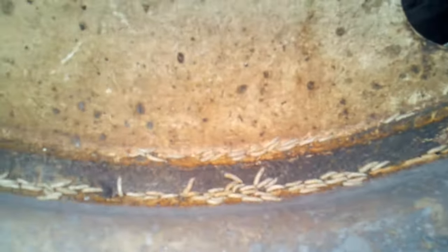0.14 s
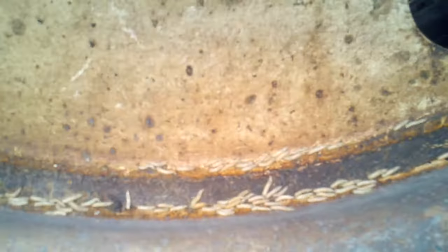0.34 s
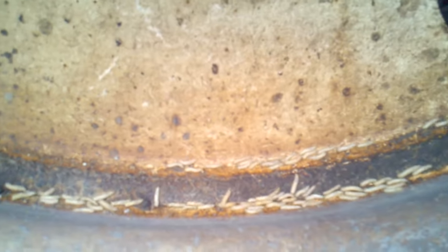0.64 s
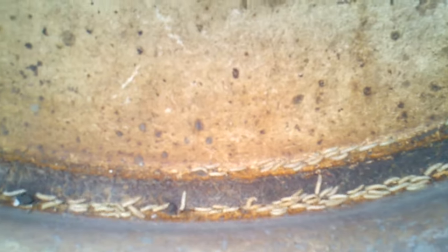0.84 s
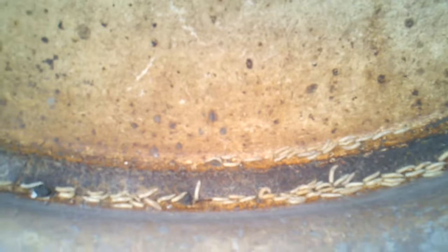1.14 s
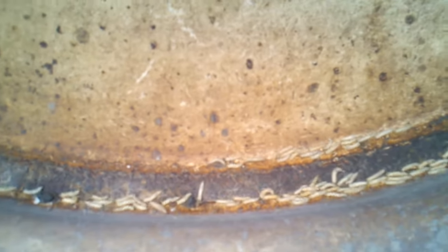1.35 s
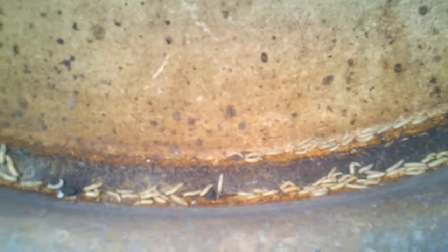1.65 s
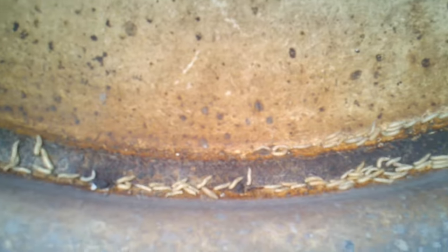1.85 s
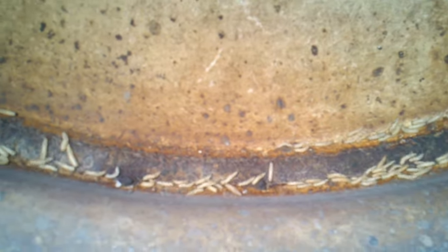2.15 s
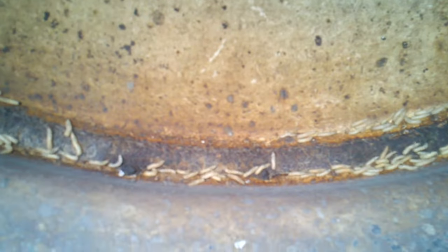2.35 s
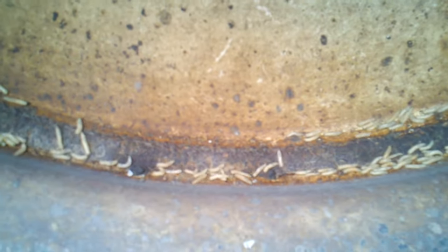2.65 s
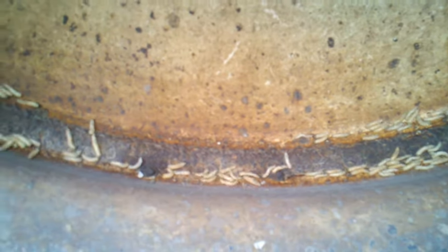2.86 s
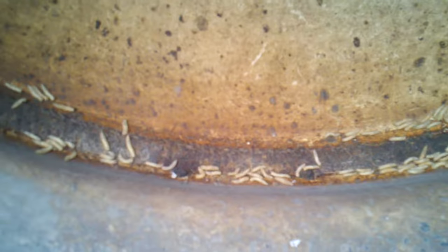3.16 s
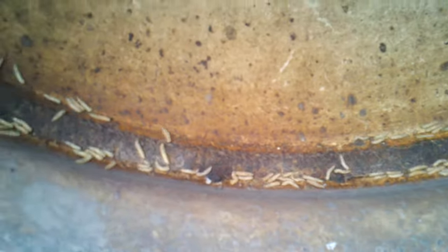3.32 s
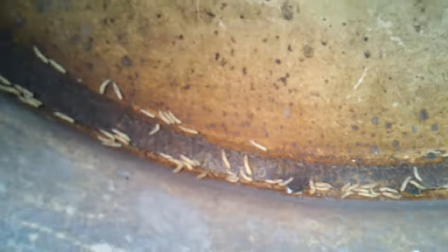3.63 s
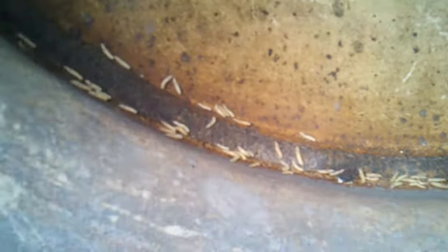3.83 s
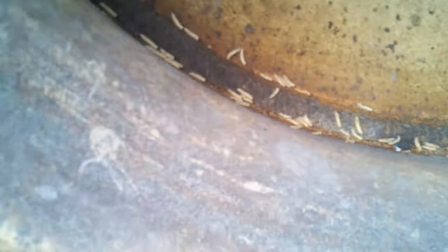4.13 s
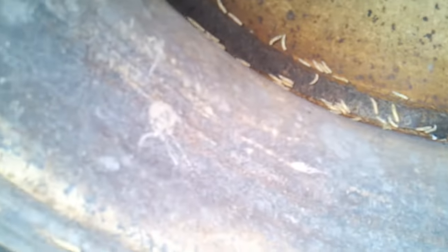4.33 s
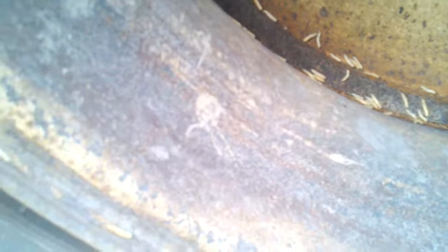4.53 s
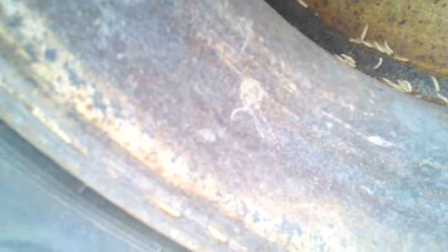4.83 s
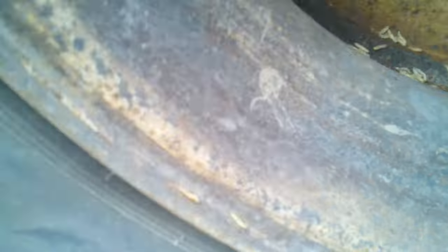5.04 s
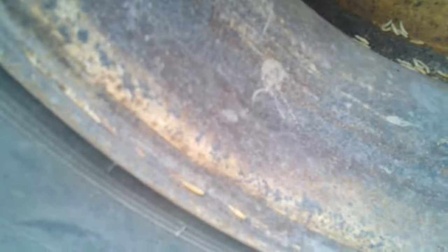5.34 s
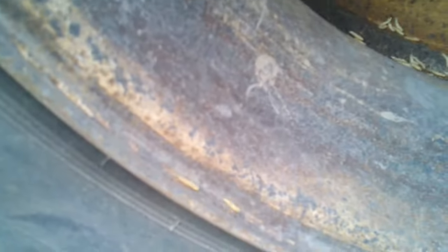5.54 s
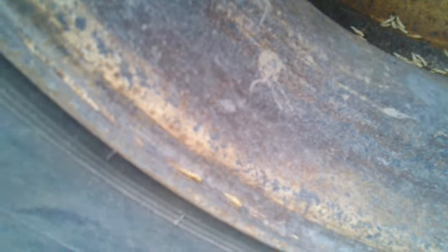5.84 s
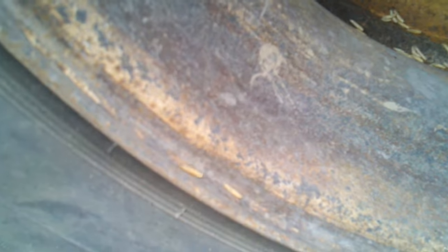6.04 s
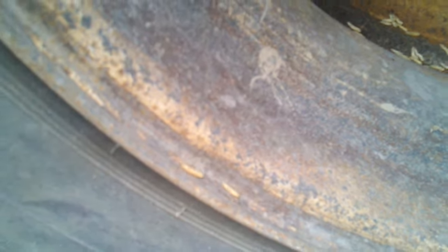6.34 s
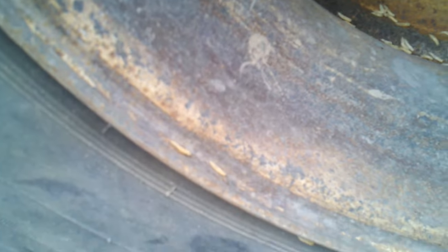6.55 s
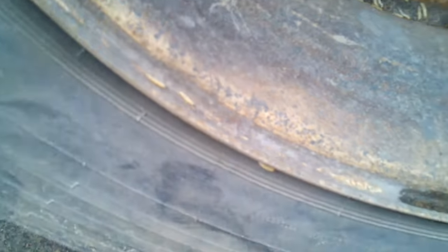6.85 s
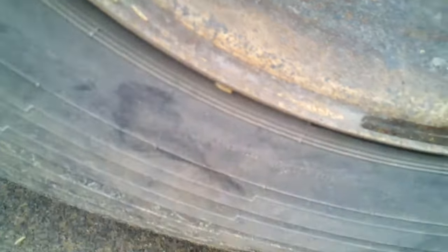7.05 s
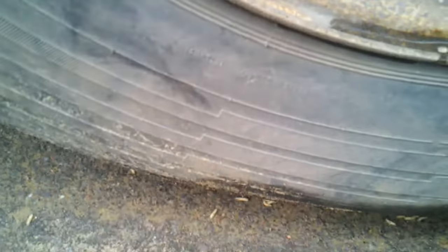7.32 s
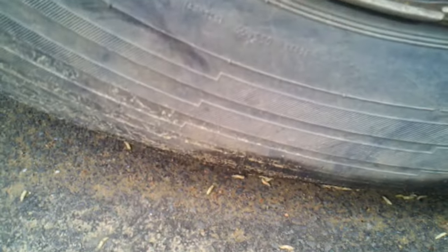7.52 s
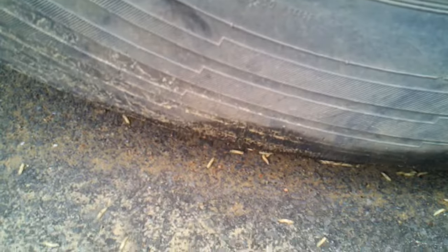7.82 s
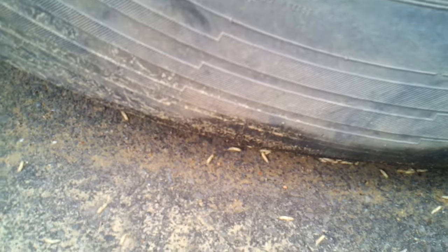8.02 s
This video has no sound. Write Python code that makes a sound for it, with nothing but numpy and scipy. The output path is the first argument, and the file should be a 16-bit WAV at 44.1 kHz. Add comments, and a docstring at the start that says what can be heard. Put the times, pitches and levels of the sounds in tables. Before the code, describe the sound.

Close outdoors, a clattering diesel idle gives way, after a few thin squeaks, to the louder hum and rush of its cooling fan.

```python
"""A big diesel idles close by, humming and clattering, and one valve ticks above the rest.
About a second in, the fan clutch squeaks in short slips. Then it bites: the engine sags, overshoots
and settles, while the cooling fan covers the clatter with a low roar, a rush and a blade tone.
Later the listener drifts from a wheel's hub to its rim, then to the ground, and each spot colours the
sound differently. Air hiss and a faint rumble run throughout; two microphones make the stereo."""
import sys
import numpy as np
from scipy import signal
from scipy.fft import rfft, irfft, next_fast_len
from scipy.io import wavfile
from scipy.ndimage import uniform_filter1d, map_coordinates

SR = 44100
rng = np.random.default_rng(int(sys.argv[2]) if len(sys.argv) > 2 else 0)


def wav_record(signal):
    """Record a signal, one row per channel, as 16-bit PCM in the file named by sys.argv[1]."""
    frames = np.transpose(np.atleast_2d(signal))
    bounded = np.clip(frames, -1, 1)
    # unit amplitude maps onto the largest positive 16-bit level
    quanta = np.round(bounded * 32767).astype(np.int16)
    wavfile.write(sys.argv[1], SR, quanta)


N = 360738
TIME = np.arange(N) / SR
BITE_S, COVER_S = 1.345, 0.08  # the clutch bites; the fan covers the clatter this much later

# Engine speed; a cycle is one round of the firing pattern: (time [s], speed [cycles/s])
SPEED = [(0, 8.296), (1.345, 8.296), (1.42, 8.02), (1.55, 8.04), (1.7, 8.22), (1.85, 8.33), (2.0, 8.385),
         (2.4, 8.366), (2.65, 8.35), (2.9, 8.318), (3.6, 8.306), (4.0, 8.297), (8.18, 8.294)]
def engine_cycles():
    """Cycles run so far: the engine sags under the fan's load, overshoots and settles."""
    return np.cumsum(curves(SPEED)[0] * (1 + 0.0004 * wobble(2.5))) / SR

# Three firings, then three valve knocks: (position [share of a cycle], relative level [dB])
BLOWS = [(0, -1), (.33, 1), (0.67, 0.5), (0.121, -1), (0.521, -1), (.81, 0)]
def knocking(cycles):
    """Firings and valves strike in the same pattern every cycle and ring on in block and yard."""
    blows = np.zeros(N)
    for position, db in BLOWS:
        at = np.flatnonzero(np.diff(np.floor(cycles - position)))
        blows[at] = amp(db + 1.2 * rng.standard_normal(len(at)))
    decay = amp(-60 * np.arange(SR // 4) / SR / 0.19)  # 60 dB down in 0.19 s
    spectrum = rfft(decay * rng.standard_normal((2, SR // 4)))
    tail = irfft(spectrum / np.abs(spectrum) ** .75, SR // 4)  # flattened, so no pitch stands out
    return unit(signal.fftconvolve(blows[None], tail, axes=1)[:, :N])

# The engine's low tones: (pitch [times the engine speed], level before boosts [dB])
HUM_TONES = [(6, -52), (8, -64), (9, -49), (10, -59), (11, -58), (12, -48), (13, -48), (14, -59), (15, -41),
             (16, -50), (17, -52), (18, -47), (19, -53), (20, -48), (21, -46), (24, -51), (25, -54),
             (26, -48), (27, -56), (28, -56), (29, -61), (30, -52), (31, -60), (33, -59), (42, -66)]
# How load lifts them: (time [s], boost of the other tones [dB], boost of every third tone [dB])
LOAD_BOOST = [(0, -4.5, 0.5), (1.3, 0, -1), (1.5, 8.5, 3), (2, 8, 2.5), (3.5, 8, 2), (5, 3.5, 5.5),
              (8.18, 5, 5.5)]
# The idle's low range. Every COLOUR table describes the two microphones' sum and difference:
# (frequency [Hz], sum [dB], difference [dB], likeness in step [ratio], likeness a quarter wave ahead [ratio])
IDLE_LOW_COLOUR = [(60, -11.8, -36.7, 0.83, 0.57), (98, -6.3, -29.2, -0.08, 0.78),
                   (121, -0.7, -17.7, 0.72, 0.69), (201, -8.5, -32.2, 0.13, 0.48),
                   (258, -11.9, -29.4, -0.64, -0.21), (302, -25.7, -29.4, -0.16, 0.07),
                   (346, -22.4, -22.9, -0.92, 0.43), (392, -28.8, -26.7, -0.06, 0.1),
                   (433, -22.4, -24.4, 0.02, -0.42), (514, -30.9, -36.9, 0.3, 0.01),
                   (561, -24.4, -34.8, 0.73, -0.06), (700, -23.7, -28.2, 0.32, 0.6)]
def engine_hum(cycles):
    """Low tones that follow the engine speed; the fan housing boosts some once the fan turns."""
    housing_share = 0.6 * fan_fade_in()
    tones = 0
    other_db, firing_db = curves(LOAD_BOOST)
    for multiple, db in HUM_TONES:
        load_db = firing_db if multiple % 3 == 0 else other_db  # three firings a cycle
        housing_db = housing_share * resonance_db(multiple * SPEED[0][1], FAN_HOUSING)
        level = amp(db + load_db + housing_db + 2 * wobble(5))
        tones = tones + level * np.sin(2 * np.pi * (multiple * cycles + rng.random()))
    return place_tones(np.sqrt(2) * tones, IDLE_LOW_COLOUR)

# How much of the clatter is knocks, the rest being noise: (frequency [Hz], share of power [0-1])
CLATTER_KNOCK_SHARE = [(220, .15), (300, .6), (600, .45), (1000, .3), (1300, .15), (2000, .14), (3000, .07),
                       (4300, .04)]
# The idle's upper range: (columns as in IDLE_LOW_COLOUR)
IDLE_HIGH_COLOUR = [(720, -23.9, -29.5, 0.3, 0.6), (839, -19.2, -27.4, -0.39, 0.77),
                    (893, -24.6, -27.0, -0.66, 0.33), (943, -24.2, -25.5, 0.26, -0.71),
                    (995, -23.5, -26.2, 0.5, 0.63), (1118, -27.5, -30.6, 0.07, 0.39),
                    (1180, -21.8, -28.1, -0.24, -0.3), (1362, -25.4, -22.8, 0.67, 0.75),
                    (1504, -30.7, -28.3, -0.4, -0.03), (1675, -28.4, -25.3, -0.73, 0.48),
                    (1986, -30.2, -29.0, -0.53, -0.11), (2486, -38.3, -36.2, -0.1, -0.35),
                    (3029, -38.1, -42.3, -0.13, -0.24), (4300, -48.9, -49.3, 0.23, 0.21)]
# Peaks and gaps of the engine block: (frequency [Hz], width [Hz], boost [dB])
ENGINE_BLOCK = [(310, 39, -2.5), (380, 29, -2), (490, 23, 1), (535, 37, -4), (568, 13, 5), (834, 20, -2),
                (1070, 16, -4), (1180, 18, 1), (1280, 20, 1), (1330, 23, -4), (1400, 25, 5.5),
                (1460, 60, -6)]
# High tones before the fan starts: (pitch [times the engine speed], starting level [dB])
CLATTER_TONES = [(69, -64.5), (84, -66), (100, -70), (104, -68), (114, -68), (121, -64), (132, -71),
                 (142, -63.5), (147, -66), (155, -66), (168, -67.5), (182, -71.5), (204, -69), (220, -70)]
def engine_clatter(cycles, knocks):
    """Knocks and noise ring through the engine block, swelling until the fan covers them."""
    colour = IDLE_LOW_COLOUR + IDLE_HIGH_COLOUR
    rattle = knocks_and_noise(knocks, CLATTER_KNOCK_SHARE, depth_db=1.3)
    rattle = filtered(rattle, lambda hz: amp(-6.5 * (hz < 265)))  # quieter among the low tones
    swell_db = 2.5 * np.minimum(TIME, BITE_S) + 0.51 * wobble(8.9)
    clatter = amp(-42.5) * place_noise(rattle, colour, ENGINE_BLOCK)
    return (1 - fan_fade_in()) * amp(swell_db) * (clatter + ringing(cycles, CLATTER_TONES, colour))

def ringing(cycles, table, colour):
    """High engine tones on whole multiples of its speed, with one set of levels or one for each spot."""
    steps = np.arange(8193)
    position = steps / steps[-1]
    multiples, *levels_db = np.transpose(table)
    phases = np.outer(position, np.round(multiples)) + rng.random(len(multiples))
    one_cycle = np.sqrt(2) * np.sin(2 * np.pi * phases)
    tones = drift([np.interp(cycles % 1, position, one_cycle @ amp(db)) for db in levels_db])
    return amp(1.9 * wobble(4.6)) * place_tones(tones, colour)

def fan_fade_in():
    """Rises from 0 to 1 as the clutch bites."""
    return np.clip((TIME - BITE_S) / COVER_S, 0, 1)

def fan_kick():
    """Jumps from 0 to 1.5 as the clutch bites, then settles at 1."""
    return np.interp(TIME - BITE_S, [0, 0.012, COVER_S], [0, 1.5, 1])

# How loud the moving air is: (time [s], drone [dB], rush [dB], hiss [dB])
AIR_LEVELS = [(0, -43, -41, -60.5), (1.0, -43, -41, -63), (1.15, -41, -39, -58.5), (1.4, -40.5, -42, -59),
              (1.72, -37.5, -40, -56.5), (3.2, -37, -38, -56), (3.5, -37.5, -40, -57.5),
              (4.1, -33.5, -41, -53.5), (4.6, -33.5, -40, -53.5), (7.1, -32.5, -39.5, -53),
              (8.18, -31, -38.5, -51)]
# How much of drone and rush is knocks: (frequency [Hz], share of power [0-1])
FAN_KNOCK_SHARE = [(260, .08), (560, .13), (720, .3), (950, .45), (1250, .33), (2000, .31), (3100, .27),
                   (4000, .1)]
# The mid-pitched drone at hub, rim and ground: (columns as in IDLE_LOW_COLOUR)
DRONE_COLOURS = [
    [(260, -0.6, -17.8, -0.3, -0.48), (289, -1.9, -9.5, 0.65, -0.28), (306, -7.6, -8.4, 0.55, 0.45),
     (337, -9.6, -7.9, -0.32, 0.73), (367, -14.0, -9.1, 0.35, 0.08), (391, -9.4, -7.5, 0.63, 0.33),
     (472, -5.6, -10.4, 0.54, -0.2), (506, -12.6, -21.5, 0.62, -0.01), (517, -11.3, -23.1, 0.2, 0.5),
     (760, -9.9, -13.6, 0.16, 0.81), (845, -9.2, -13.3, -0.7, 0.67), (900, -14.9, -14.7, -0.7, 0.01),
     (939, -9.7, -18.8, 0.3, -0.32), (1050, -14.0, -15.8, 0.33, 0.91)],
    [(260, -6.9, -14.7, 0.35, -0.63), (291, -0.7, -14.3, 0.75, 0.26), (339, -3.4, -11.1, 0.86, 0.52),
     (402, -5.8, -18.9, 0.49, 0.31), (462, 0.0, -7.7, 0.31, 0.96), (479, -4.5, -12.3, -0.26, 0.83),
     (503, -14.0, -14.8, 0.27, 0.62), (539, -3.2, -7.6, 0.78, 0.62), (608, -9.6, -15.8, 0.42, 0.84),
     (704, -8.5, -11.4, -0.18, 0.91), (816, -17.1, -14.5, 0.28, 0.64), (869, -14.2, -17.4, 0.86, 0.3),
     (952, -7.5, -13.7, -0.42, 0.9), (1050, -16.9, -14.1, -0.7, 0.29)],
    [(260, -7.9, -16.0, 0.75, 0.38), (325, -2.2, -11.0, 0.71, 0.68), (344, 0.3, -8.3, 0.66, 0.75),
     (372, -6.6, -16.6, 0.51, 0.53), (391, -3.6, -16.9, 0.47, 0.55), (410, -7.8, -16.8, 0.18, 0.6),
     (465, -1.7, -10.7, 0.34, 0.87), (506, -12.9, -16.8, -0.08, 0.85), (543, -7.6, -10.2, 0.28, 0.95),
     (660, -10.5, -14.9, 0.33, 0.75), (704, -2.4, -7.5, 0.3, 0.97), (740, -10.3, -11.8, -0.17, 0.81),
     (816, -15.8, -15.3, 0.26, 0.87), (1050, -16.1, -15.5, -0.07, 0.79)],
]
# The higher rush at hub, rim and ground: (columns as in IDLE_LOW_COLOUR)
RUSH_COLOURS = [
    [(1050, -3.8, -6.1, 0.38, 0.86), (1210, -0.2, -5.6, -0.16, -0.28), (1355, -3.5, 1.8, 0.02, 0.9),
     (1561, -10.9, -7.4, -0.3, 0.15), (1664, -1.7, -0.8, -1.03, -0.11), (1825, -4.3, -2.0, -0.83, 0.16),
     (1987, -8.5, -2.3, -0.72, -0.52), (2102, -10.8, -12.4, -0.3, 0.08), (2209, -5.4, -12.7, -0.18, -0.61),
     (2440, -14.3, -13.0, 0.01, 0.0), (2791, -14.0, -20.6, -0.1, -0.25), (3285, -16.3, -19.3, 0.2, 0.25),
     (3950, -24.5, -26.4, 0.1, 0.08), (4300, -25.9, -23.7, 0.09, 0.32)],
    [(1050, -0.9, 2.6, -0.81, 0.18), (1119, -6.7, -1.8, 0.08, 0.23), (1317, -0.0, 5.8, -0.1, 0.34),
     (1365, -4.8, 4.7, -0.22, 0.78), (1641, -5.1, 1.0, -0.31, -0.69), (1700, -5.9, -1.6, 0.23, 0.01),
     (1749, -7.2, -0.7, -0.63, 0.07), (1851, -0.5, 2.2, -0.95, -0.15), (1987, -1.8, -5.0, -0.45, -0.6),
     (2656, -6.5, -16.2, 0.08, 0.11), (2975, -11.3, -14.6, 0.18, 0.63), (3193, -9.7, -10.8, 0.6, 0.64),
     (3785, -20.7, -15.6, 0.19, 0.23), (4300, -20.7, -18.0, 0.37, 0.02)],
    [(1050, -1.2, -0.8, -0.04, 0.96), (1176, -3.7, 0.7, -0.23, 0.27), (1365, -5.1, 0.1, 0.04, 0.6),
     (1434, -3.1, 4.4, -0.83, 0.24), (1550, -0.2, 0.1, -0.74, -0.19), (1618, -7.0, -2.2, -0.25, -0.28),
     (1724, -9.6, -1.9, -0.22, -0.55), (2058, -0.6, -1.5, -0.64, -0.61), (2148, -4.9, -8.2, -0.31, -0.67),
     (2582, -4.6, -14.7, 0.03, -0.3), (2851, -10.1, -18.3, 0.33, 0.23), (3193, -10.5, -14.3, 0.32, 0.79),
     (3785, -19.7, -14.1, 0.38, 0.03), (4300, -22.3, -18.2, 0.21, 0.23)],
]
# Peaks and dips in the fan's rushing air at each spot: (frequency [Hz], width [Hz], boost [dB])
FAN_WIND_PEAKS = [
    [(425, 28, 5), (688, 15, 2), (765, 26, 2), (966, 16, -4), (1080, 160, -2), (1277, 11, 6),
     (1460, 200, -2), (1485, 22, 5), (1710, 15, -1), (1736, 19, -3), (1930, 30, -5)],
    [(295, 14, 1.5), (351, 20.4, 2), (468, 17, 3), (498, 16, -7), (542, 8.9, 4), (700.5, 7.5, 6),
     (947, 10, -1), (1013, 22, -1.5), (1110, 410, -2.5), (1290, 10, 0), (1310, 7.7, 5), (1840, 35, -0.5),
     (2060, 26, 3)],
    [(302.8, 26, 4.5), (345, 20, -2), (384, 12, 3), (460, 14, 3), (546, 16, 3.5), (704, 5.9, 2),
     (984, 20, 7), (1055, 150, -5), (1120, 12, 4), (1530, 34, -7), (2067, 20, 4)],
]
# High engine tones beside the fan: (pitch [times the engine speed], hub [dB], rim [dB], ground [dB])
TONES_BESIDE_FAN = [(66.2, -66, -59, -60), (71.8, -68, -62, -56), (78.4, -68, -56, -56),
                    (82, -66, -66, -53), (84, -58, -57.5, -44.5), (86, -66, -66, -51), (96, -64, -61, -60),
                    (104, -63, -63, -58), (108, -73, -58, -62), (113, -62, -55.5, -63),
                    (114, -61, -55, -57), (118, -62, -53, -62), (127, -68, -66, -59), (142, -60, -70, -70),
                    (149, -70, -62, -62), (172, -72, -68, -62), (178, -72, -70, -62),
                    (155.5, -59.5, -71, -63), (159.4, -70, -69, -61), (173.3, -68, -62.5, -61),
                    (182, -65, -73, -64), (186.2, -70, -72, -56), (193.3, -74, -68, -66),
                    (199.7, -63, -72, -69), (203.4, -56.5, -69, -68), (220, -62, -70, -65),
                    (224, -68, -61, -66), (227.4, -73, -63, -60), (240.5, -68, -63, -64)]
def fan_wind(cycles, knocks):
    """The fan's air drones and rushes, with the engine's knocks and high tones inside it."""
    drone_db, rush_db, _ = curves(AIR_LEVELS)
    air = knocks_and_noise(knocks, FAN_KNOCK_SHARE, depth_db=0.76)
    wind = 0
    for db, waver_db, colours in (drone_db, 0.46, DRONE_COLOURS), (rush_db, 0.83, RUSH_COLOURS):
        spots = [place_noise(air, colour, peaks) for colour, peaks in zip(colours, FAN_WIND_PEAKS)]
        wind = wind + amp(db + waver_db * wobble(6)) * drift(spots)
    tones = ringing(cycles, TONES_BESIDE_FAN, DRONE_COLOURS[1] + RUSH_COLOURS[1])
    return fan_fade_in() * (wind + tones)

# The roar's swells and dips: (time [s], level [dB])
ROAR_LEVEL = [(1.3, -33.5), (1.8, -34), (2.3, -28.5), (2.5, -33), (2.68, -29), (2.78, -39), (3.06, -27.5),
              (3.11, -37), (3.17, -27.5), (3.35, -25), (3.43, -41), (3.54, -37.5), (3.6, -30), (4.3, -32.5),
              (4.5, -29), (4.58, -36.5), (4.96, -31.5), (5.05, -33), (5.15, -31), (7.9, -33), (8.18, -27.5)]
# The roar at the hub, then at both rim and ground: (columns as in IDLE_LOW_COLOUR)
ROAR_COLOURS = [
    [(60, -21.3, -45.8, 0.68, 0.62), (98, -10.4, -33.0, 0.05, 0.89), (123, -5.7, -21.4, 0.77, 0.49),
     (140, -1.9, -25.7, 0.77, 0.14), (156, -1.9, -26.4, 0.14, 0.84), (178, -0.1, -23.8, -0.41, 0.79),
     (203, -8.8, -29.7, -0.06, 0.9), (243, -16.1, -35.2, -0.47, 0.03), (270, -19.7, -34.4, -0.06, -0.5)],
    [(60, -18.1, -41.1, 0.59, 0.68), (79, -13.0, -35.6, 0.41, 0.73), (96, -9.7, -26.3, -0.21, 0.96),
     (126, -3.1, -21.8, 0.77, 0.55), (141, -0.3, -24.1, -0.33, 0.39), (173, -0.4, -14.4, -0.66, 0.73),
     (206, -11.6, -24.7, -0.53, 0.66), (243, -20.9, -27.0, -0.12, -0.34), (270, -20.8, -29.9, 0.63, -0.18)],
]
# Low pitches at which the fan housing rings: (frequency [Hz], width [Hz], boost [dB])
FAN_HOUSING = [(145.6, 16, 6.5), (173.6, 8.3, 7.5)]
def fan_roar():
    """Deep air noise from the fan booms in its housing."""
    air = patchy_noise(depth_db=2.5)
    level = amp(curves(ROAR_LEVEL)[0] + 0.89 * wobble(7))
    roar = drift([place_noise(air, colour, FAN_HOUSING) for colour in ROAR_COLOURS])
    return fan_kick() * level * even_out(roar, span_s=0.049, share=0.52)

# How loud the blades sing: (time [s], tone [dB], octave [dB])
BLADE_LEVELS = [(1.35, -42, -81), (1.5, -31.5, -53), (2, -28, -49), (3.3, -31, -47.5), (4.5, -31.5, -46),
                (6, -35, -42), (8.18, -39, -39)]
# Tone, then octave, at each spot: (difference compared with sum [dB], lead of the difference [rad])
BLADE_STEREO = [
    [(-24, -1.1), (-14, -2.1), (-10, -1.6)],
    [(-8, .2), (-3, 1.3), (-4, 1.4)],
]
def fan_blades(cycles):
    """The passing blades make a tone and its octave, which follow the engine speed."""
    passes_per_cycle = 26.22
    phase = 2 * np.pi * (passes_per_cycle * cycles + np.cumsum(0.5 * wobble(6)) / SR)
    tones = 0
    for harmonic, (db, spots) in enumerate(zip(curves(BLADE_LEVELS), BLADE_STEREO), 1):
        difference = drift([amp(side_db) * np.sin(harmonic * phase + lead) for side_db, lead in spots])
        level = np.sqrt(2) * amp(db + 1.4 * wobble(12))
        tones = tones + level * np.array([np.sin(harmonic * phase), difference])
    return fan_kick() * tones

# Slips of the clutch: (time [s], length [s], pitch [Hz], level [dB])
CLUTCH_SLIPS = [(0.922, 0.04, 8520, -55), (.97, 0.04, 8420, -55.5), (1.02, 0.034, 8460, -51.5),
                (1.062, 0.056, 8420, -53.5), (1.124, 0.034, 8330, -56), (1.165, 0.07, 8400, -63)]
def clutch_squeak():
    """The clutch slips before it bites: thin, rough squeaks that each sag in pitch."""
    fade_s, sag_hz_per_s = 0.012, 900
    roughness = unit(1 + .45 * wobble(260))
    waver = np.cumsum(22 * wobble(150)) / SR
    squeaks = 0
    for start, length, hz, db in CLUTCH_SLIPS:
        age = TIME - start
        fade = np.clip(np.minimum(age, length - age) / fade_s + .5, 0, 1)
        phase = 2 * np.pi * (hz * age - sag_hz_per_s * age ** 2 / 2 + waver)
        squeaks = squeaks + fade * amp(db) * np.sin(phase)
    return amp([[0], [-3.8]]) * roughness * squeaks  # nearer the left microphone

# The loudest valve: (time [s], level [dB])
TICK_LEVEL = [(0, -71), (1.3, -68), (3.5, -64), (4.2, -59), (8.18, -56)]
def valve_tick(cycles):
    """One valve gives a short metallic tick every cycle, much alike each time."""
    position, rise_s, decay_s, repeat_share = .745, .002, .005, .6
    age = (cycles - position) % 1 / SPEED[0][1]
    repeated = rng.standard_normal(SR // 4)[(age * SR).astype(int)]
    noise = np.sqrt(repeat_share) * repeated + np.sqrt(1 - repeat_share) * rng.standard_normal((2, N))
    strength_db = 2 * rng.standard_normal(int(cycles[-1]) + 3)[(cycles - position + 1).astype(int)]
    ticks = amp(strength_db) * np.exp(-age / decay_s) * (1 - np.exp(-age / rise_s)) * noise
    return amp(curves(TICK_LEVEL)[0]) * place_noise(unit(ticks), RUSH_COLOURS[1][7:])  # treble only

# The high hiss: (columns as in IDLE_LOW_COLOUR)
HISS_COLOUR = [(4300, -0.7, 2.5, 0.34, 0.29), (5412, -2.4, -2.9, -0.05, -0.11),
               (5947, -0.3, -1.4, 0.17, -0.14), (6731, -1.7, -0.7, -0.03, 0.08),
               (7310, -0.2, -0.7, 0.06, 0.23), (7939, -0.4, -0.3, -0.03, -0.07),
               (13182, -8.1, -7.8, -0.01, 0.05), (13900, -9.9, -11.6, 0.08, -0.17)]
def air_hiss():
    """Air hiss that flutters a little."""
    level = amp(curves(AIR_LEVELS)[2] + 0.18 * wobble(10))
    return level * place_noise(patchy_noise(depth_db=1.92), HISS_COLOUR)

def yard_rumble():
    """Faint deep rumble of the yard, about 18 to 50 Hz."""
    band = lambda hz: 1 / (1 + (hz / 50) ** 8) / (1 + (18 / (hz + 1)) ** 4)
    return amp([[-25], [-46]]) * filtered(rng.standard_normal((2, N)), band)

# Where the listener is: (time [s], spot [0 hub, 1 rim, 2 ground])
LISTENER_PATH = [(0, 0), (3.5, 0), (4.2, 1), (7, 1), (7.3, 2), (8.18, 2)]
def drift(sounds):
    """Fades from one spot's sound to the next as the listener moves."""
    spot = np.minimum(curves(LISTENER_PATH)[0], len(sounds) - 1)
    return sum(np.clip(1 - np.abs(spot - k), 0, 1) * sound for k, sound in enumerate(sounds))

FFT_SIZE = next_fast_len(N + SR // 4)
FFT_HZ = np.fft.rfftfreq(FFT_SIZE, 1 / SR)
def read_colour(colour):
    """A colour table as smooth curves: frequency, sum gain, difference gain and likeness."""
    points_hz, *columns = np.transpose(colour)
    hz = FFT_HZ[:int(1.5 * points_hz[-1] * FFT_SIZE / SR)] + 1e-3
    sum_db, diff_db, in_step, ahead = [np.interp(np.log(hz), np.log(points_hz), c) for c in columns]
    likeness = (in_step + 1j * ahead) / np.maximum(1, np.hypot(in_step, ahead))
    return hz, amp(sum_db), amp(diff_db), likeness

def place_tones(tones, colour):
    """Sum and difference for tones that come straight from the source and keep their own levels."""
    hz, sum_gain, difference_gain, likeness = read_colour(colour)
    direct = rfft(tones, FFT_SIZE)[:len(hz)]
    difference = direct * difference_gain / sum_gain * likeness / np.abs(likeness)
    return irfft([direct, difference], FFT_SIZE)[:, :N]

def place_noise(pair, colour, resonances=()):
    """Sum and difference for a direct and a scattered noise; the sum has rms 1 after the cross feed."""
    hz, sum_gain, difference_gain, likeness = read_colour(colour)
    band_edges = np.sqrt((1 + (colour[0][0] / hz) ** 40) * (1 + (hz / colour[-1][0]) ** 40))
    gain = amp(resonance_db(hz, resonances)) / band_edges
    direct, scattered = rfft(pair, FFT_SIZE)[:, :len(hz)] * gain
    total = direct * sum_gain
    unlikeness = np.sqrt(np.abs(1 - np.abs(likeness) ** 2))
    difference = (direct * likeness + scattered * unlikeness) * difference_gain
    heard_rms = np.sqrt(2 * np.sum(np.abs(total * (1 - cross_feed(hz))) ** 2) / FFT_SIZE / N)
    return irfft([total, difference], FFT_SIZE)[:, :N] / heard_rms

def resonance_db(hz, resonances):
    """The boost or cut that a set of peaks and gaps gives each frequency."""
    return sum(db / (1 + (2 * (hz - centre) / width) ** 2) for centre, width, db in resonances)

def knocks_and_noise(knocks, shares, depth_db):
    """Knocks and patchy noise, sharing the power at each frequency."""
    points_hz, share = np.transpose(shares)
    knock_share = lambda hz: np.interp(np.log(hz + 1), np.log(points_hz), share)
    gains = lambda hz: np.sqrt([[knock_share(hz)], [1 - knock_share(hz)]])
    return filtered(np.array([knocks, unit(patchy_noise(depth_db))]), gains).sum(axis=0)

def patchy_noise(depth_db):
    """Two noises with the same louder and softer patches in pitch and time."""
    spectra = signal.stft(rng.standard_normal((2, N)), nperseg=512)[2]
    patches = uniform_filter1d(rng.standard_normal(spectra.shape[1:]), size=8, axis=0)
    patches = uniform_filter1d(patches, size=10, axis=1)
    return signal.istft(spectra * amp(depth_db * unit(patches)), nperseg=512)[1][:, :N]

def even_out(pair, span_s, share):
    """Takes a share of the chance swells out of a narrow noise."""
    envelope = np.abs(signal.hilbert(pair[0], next_fast_len(N))[:N])
    power = uniform_filter1d(envelope ** 2, int(span_s * SR))
    return pair * (np.abs(power) / power.mean() + 0.068) ** (-share / 2)

def wobble(rate):
    """A smooth random curve through `rate` points a second."""
    coarse = np.arange(0, N + 128, 128 if rate < 20 else 32)
    points = rng.standard_normal(int(N * rate / SR) + 8)
    return np.interp(np.arange(N), coarse, map_coordinates(points, [coarse * rate / SR]))

def curves(rows):
    """One value per sample for each column after the time."""
    times, *columns = np.transpose(rows)
    return [np.interp(TIME, times, column) for column in columns]

def filtered(x, response):
    """Scales and delays each frequency of x by response(hz)."""
    return irfft(rfft(x, FFT_SIZE) * response(FFT_HZ), FFT_SIZE)[..., :N]

def amp(db):
    """dB to gain."""
    return 10 ** (np.asarray(db) / 20)

def unit(x):
    """Scaled to an average strength (rms) of 1."""
    return x / np.sqrt(np.mean(x ** 2) + 1e-20)

def cross_feed(hz):
    """The copy passed between the microphones: 17 samples late, and weaker above 4300 Hz."""
    return (0.23 + 0.76 / (1 + (hz / 4300) ** 40)) * np.exp(-2j * np.pi * hz * 17 / SR)

def scene():
    """Adds every source as sum and difference, then turns those into left and right."""
    cycles = engine_cycles()
    knocks = knocking(cycles)
    engine = engine_hum(cycles) + engine_clatter(cycles, knocks)
    fan = fan_wind(cycles, knocks) + fan_roar() + fan_blades(cycles)
    total, difference = engine + fan + clutch_squeak() + valve_tick(cycles) + air_hiss() + yard_rumble()
    return np.array([total + difference, total - difference])

def record(dry):
    """Each side is one microphone minus a delayed copy of the other; the highest treble is cut."""
    wide = dry - filtered(dry[::-1], cross_feed)
    return filtered(wide, lambda hz: hz < 13950)

dry = scene()
out = record(dry)
wav_record(out)
```